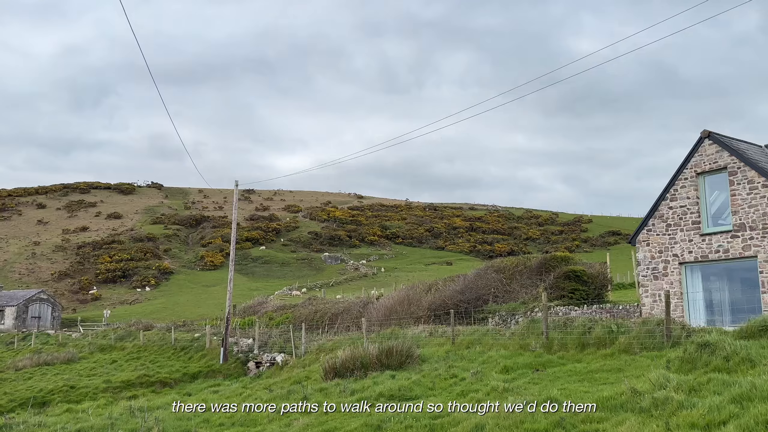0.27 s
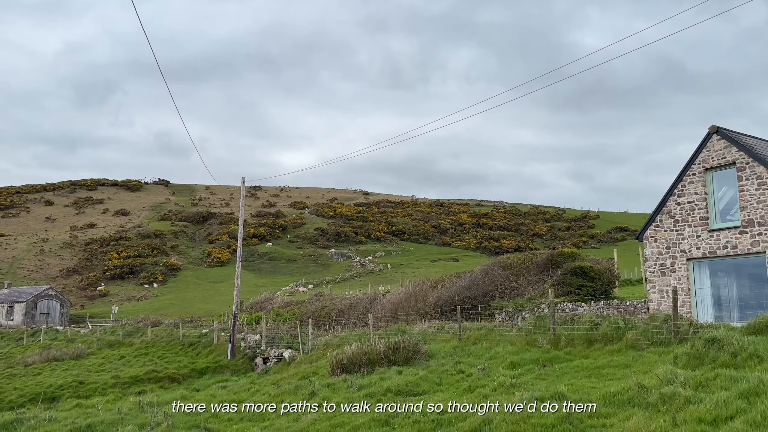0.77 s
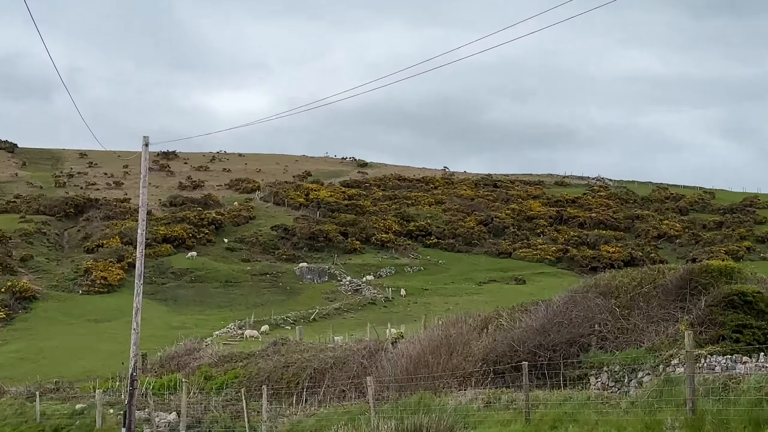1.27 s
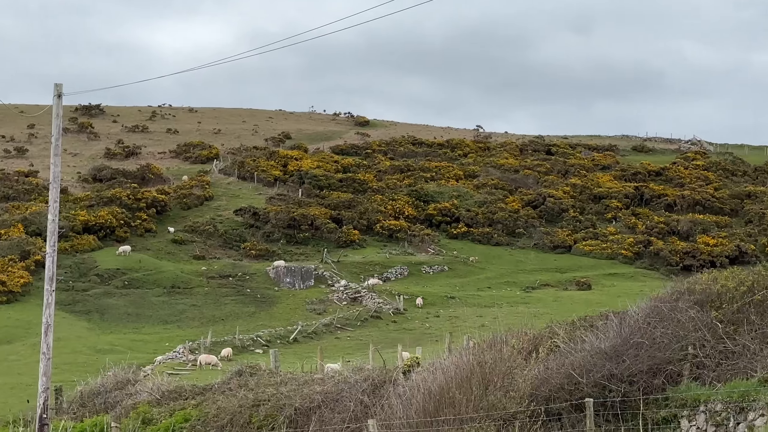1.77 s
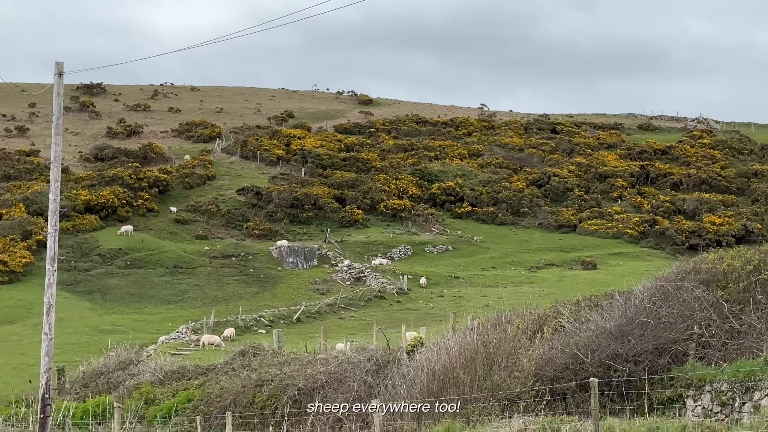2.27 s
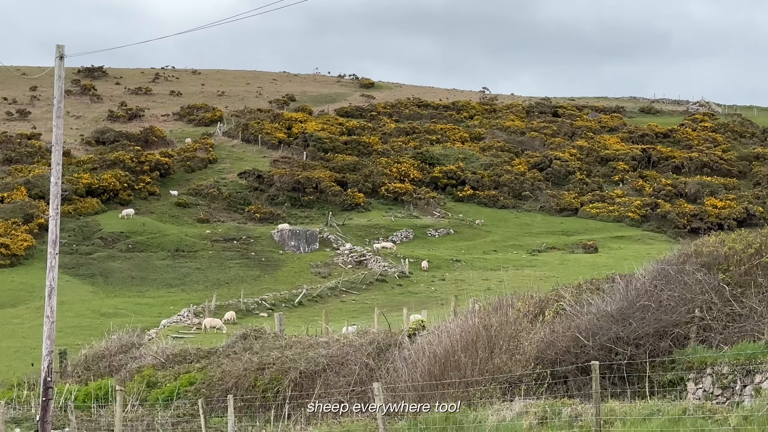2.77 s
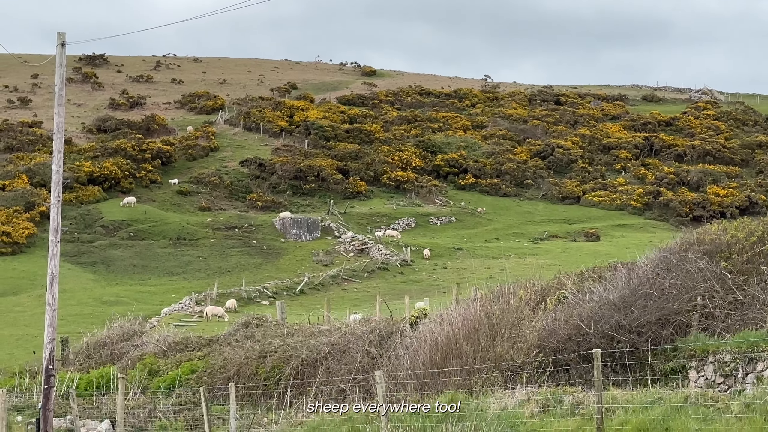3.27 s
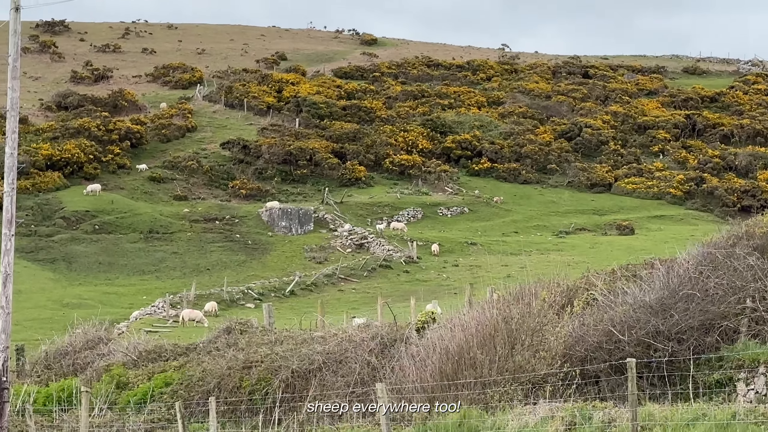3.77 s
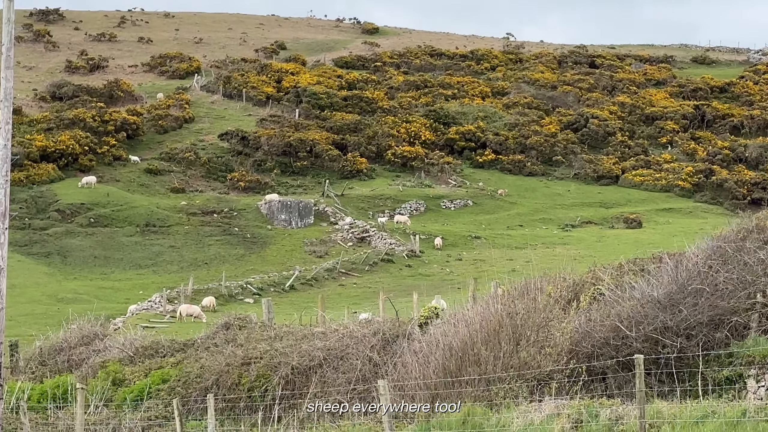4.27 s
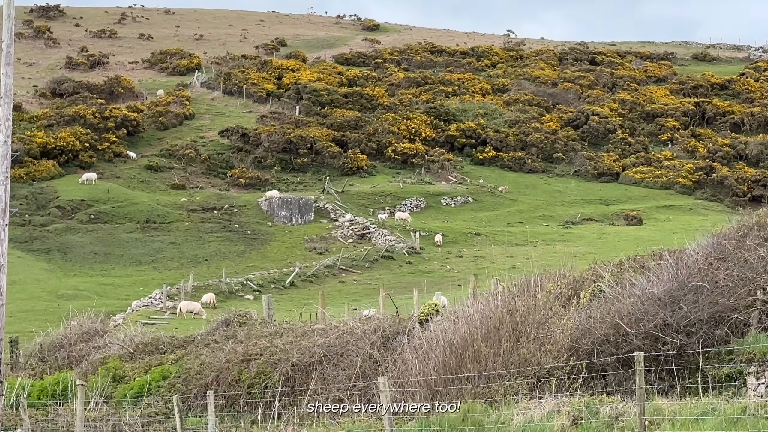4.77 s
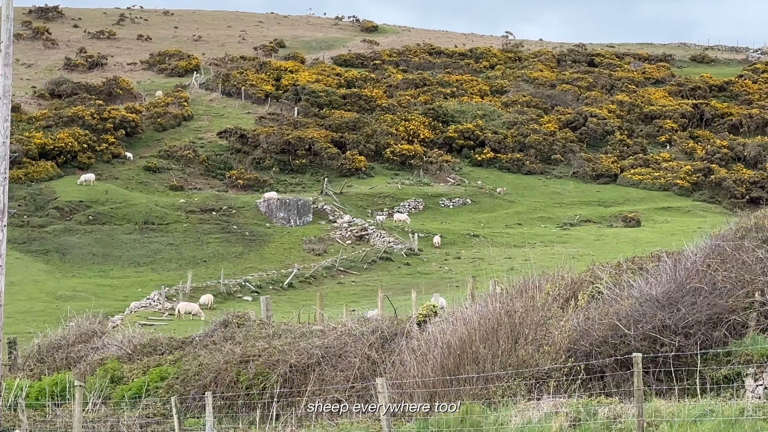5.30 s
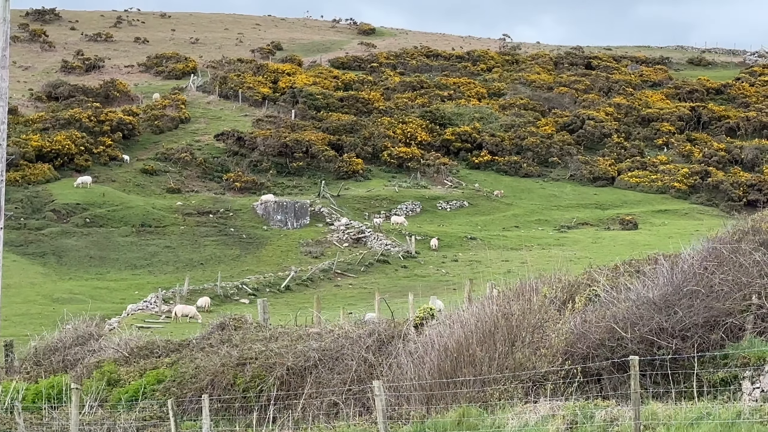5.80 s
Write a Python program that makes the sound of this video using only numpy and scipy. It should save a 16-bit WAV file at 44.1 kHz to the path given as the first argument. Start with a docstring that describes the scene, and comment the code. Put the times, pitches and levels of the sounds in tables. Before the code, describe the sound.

Low, uneven wind buffets the microphone outdoors, strongest in the first two seconds, after a quick rustle of cloth. Beneath the gusts a sheep bleats once with a rough, wavering voice. A small songbird then chirps thin, gliding notes and closes with a rapid trill, joined briefly by faint fluty piping from across the field. A faraway lamb stutters a bleat at the end as lighter puffs of wind continue.

```python
"""A breezy hill pasture. Cloth rustles briefly, then swirls of wind rumble and thump on the microphone.
A sheep gives one long, hoarse bleat: puffs of air from its throat make its mouth ring.
A wren sings gliding whistles and trills, and a lower-voiced bird pipes far off.
At the end a distant lamb bleats in short, shaky bursts. A soft hush lies under it all."""
import sys
import numpy as np
from scipy import signal
from scipy.fft import rfft, irfft
from scipy.io import wavfile
from scipy.ndimage import uniform_filter1d

SR = 44100
rng = np.random.default_rng(int(sys.argv[2]) if len(sys.argv) > 2 else 0)


def wav_out(sig):
    """Save sig, one row per channel (or a flat mono array), as 16-bit PCM at SR to the path in sys.argv[1]."""
    wavfile.write(sys.argv[1], SR, np.round(np.clip(np.atleast_2d(sig).T, -1, 1) * 32767).astype(np.int16))


N = 266319
T = np.arange(N) / SR


def wind(hit_s=0.0036, cutoff_hz=455, db_per_octave=29, hiss_hz=(9400, 11200)):
    """Faster air sheds smaller swirls, so the wind grows louder and brighter together."""
    # sharp swirls hitting the microphone: t/s, relative level/dB
    buffets = [(0.342, -37.5), (0.409, -38.5), (0.491, -35), (0.536, -29.5), (0.547, -32.5), (0.617, -30.5),
               (0.673, -37), (0.964, -34), (0.999, -28.5), (1.01, -29), (1.04, -26.5), (1.07, -32),
               (1.097, -28.5), (1.117, -26.5), (1.138, -29), (1.199, -28.5), (1.266, -29.5), (1.3, -36.5),
               (1.783, -22.5), (1.816, -17.5), (1.841, -17.5), (1.858, -35), (2.184, -43.5), (2.318, -42),
               (2.422, -43), (2.452, -45.5), (2.512, -48.5), (2.564, -42.5), (2.633, -40), (2.669, -41.5),
               (2.766, -40.5), (3.389, -42), (3.639, -48), (5.417, -40.5), (5.908, -39.5)]
    # tone of the rumble: f/Hz, relative level/dB
    rumble_tone = [(25, -36), (42, -3), (65, 6.5), (120, -0.5), (190, -6.5), (270, -27), (600, -62)]
    large, small = gusts()
    lumps = np.minimum(drift(45), 1)  # lulls are deep, surges limited
    hits = 1e-6
    for s, db in buffets:
        age = np.clip((T - s) / hit_s, 0, 40)
        hits = hits + from_db(db) * age * np.exp(1 - age)
    # small swirls flutter, up to a cutoff that rises with their force
    force = np.hypot(small * from_db(-2 + 7.5 * lumps), from_db(-8) * hits)
    left_brighter = np.array([[0.04], [-0.04]])
    cutoff = cutoff_hz * 2 ** ((20 * np.log10(force) + 50) / db_per_octave + left_brighter)
    flutter = sum(x * hz ** -1.054 / np.sqrt(1 + (hz / cutoff) ** 14)
                  for hz, x in noise_bands(230, count=7))
    # large swirls rumble; in the lulls only the deepest are left
    push = np.hypot(large * from_db(3 * lumps), from_db(-12) * hits)
    tilt = 0.52 * (20 * np.log10(push) + 45)  # dB per octave
    rumble = sum(x * from_db(at_hz(rumble_tone, hz) + tilt * np.log2(hz / 65))
                 for hz, x in noise_bands(28, count=9))
    # a thin hiss at the microphone's openings follows the flow
    hiss = unit_power(band(rng.standard_normal((2, N)), *hiss_hz))
    hiss_gain = from_db(-57) * np.sqrt(push * push.mean())
    pressure = force * evened(flutter, 0.017) + push * evened(rumble, 0.025) + thumps()
    return microphone_openings(pressure) + hiss_gain * hiss


def gusts(rise_share=0.51, edge_drop_db=4.5, roundness=1.41):
    """Gusts swell and ebb over the breeze. Gives the strength of the large swirls and the small ones."""
    # the light breeze between gusts: t/s, level/dB
    breeze = [(0, -51.5), (0.3, -52), (0.75, -43.5), (1.3, -49.5), (1.6, -64), (2.05, -52), (2.25, -61),
              (2.5, -51.5), (3.2, -62.5), (3.7, -55), (4.2, -61.5), (4.55, -65), (4.8, -68.5), (5.05, -68),
              (5.25, -54.5), (5.7, -69), (6.03, -56)]
    # gusts: peak t/s, length/s, level/dB, flutter compared with the gust/dB
    gust_peaks = [(0.399, 0.079, -42.5, -5), (0.552, 0.072, -37, -9), (0.993, 0.062, -36.5, -7.5),
                  (1.076, 0.053, -35.5, -7.5), (1.137, 0.13, -33, -10), (1.283, 0.054, -41, -2),
                  (1.443, 0.16, -47.5, -29), (1.68, 0.051, -43, -5.5), (1.823, 0.1, -35, -4.5),
                  (1.979, 0.044, -42.5, -22.5), (2.441, 0.017, -48, -9), (2.665, 0.046, -41.5, -3.5),
                  (2.757, 0.054, -41, -24), (2.857, 0.14, -51.5, -5), (3.343, 0.042, -42.5, -12.5),
                  (3.448, 0.046, -48.5, -7.5), (4.313, 0.039, -46, -14), (4.345, 0.2, -52, -8.5),
                  (5.146, 0.051, -54, -30), (5.353, 0.036, -40.5, -13), (5.422, 0.052, -42.5, -24),
                  (5.8, 0.029, -48, -12.5), (5.937, 0.061, -46, -10.5), (6.052, 0.041, -36.5, -5)]
    large = envelope(breeze) ** 2
    small = large * from_db(-17) ** 2
    for s, length, db, flutter_db in gust_peaks:
        near = slice(max(int((s - 3 * length) * SR), 0), int((s + 4 * length) * SR))
        from_peak = np.maximum((s - T[near]) / rise_share, (T[near] - s) / (1 - rise_share)) / length
        power = from_db(db - edge_drop_db * from_peak ** roundness) ** 2
        large[near] += power
        small[near] += power * from_db(flutter_db) ** 2
    return np.sqrt(large), np.sqrt(small)


def thumps(swell_s=0.0074):
    """A big swirl shoves the microphone and leaves a round, low swing of pressure."""
    # shoves: t/s, level/dB, f/Hz
    shoves = [(0.105, -37.5, 76), (0.679, -30.5, 84), (1.008, -30.5, 102.7), (1.087, -26, 75),
              (1.793, -30.5, 65), (2.771, -34.5, 90.4), (4.311, -35.5, 58.5), (4.624, -48, 93)]
    out, age = np.zeros(N), T[:SR // 10]
    swell = age / swell_s * np.exp(1 - age / swell_s)
    for s, db, hz in shoves:
        add(out, s - swell_s, from_db(db) * swell * np.sin(2 * np.pi * hz * age))
    return out


def microphone_openings(pressure, overload=0.081, top_hz=1400):
    """The openings smooth away tiny swirls and round off hard ones; air reaches the left one later."""
    left, right = overload * np.tanh(pressure / overload)
    hz = np.arange(N // 2 + 1) * SR / N
    lag_rad = 1.3 * hz / (hz + 330)
    left = irfft(rfft(left) * np.exp(-1j * lag_rad), N)
    return signal.sosfilt(signal.butter(10, top_hz, fs=SR, output="sos"), [left, right])


def sheep(pitch_shake=.05, jitter=.03, hoarseness=.33, shake_db=2, tongue_width_hz=220):
    """Shaky throat puffs make the mouth ring; the rings set by the tongue climb and grow stronger."""
    # rise and fall of the bleat: t/s, relative level/dB
    loudness = [(0.93, -100), (0.98, -77.5), (1.18, -74.5), (1.4, -75), (1.52, -75), (1.62, -75),
                (1.66, -79.5), (1.76, -79.5), (1.88, -85.5), (1.93, -92.5)]
    # throat and tongue: t/s, pitch/Hz, tongue ring/Hz
    throat = [(0.93, 142.7, 2140), (1.17, 155, 2150), (1.42, 155.8, 2230), (1.52, 156.2, 2320),
              (1.65, 151.9, 2364), (1.93, 146.3, 2446)]
    # moments when the shaking voice dips: t/s
    dips = [1.02, 1.101, 1.192, 1.273, 1.345, 1.414, 1.477, 1.557, 1.647, 1.746, 1.831, 1.9]
    # steady rings of the mouth: f/Hz, width/Hz, relative level/dB
    mouth = [(657, 59, 29.5), (800, 115, 20.5), (1410, 200, 7), (1587, 190, 6), (3160, 230, -12)]
    pitch, tongue = in_time(throat)
    shake = -np.cos(2 * np.pi * np.interp(T, dips, np.arange(len(dips))))
    cycles = np.cumsum(pitch * (1 + pitch_shake * shake + jitter * drift(98))) / SR
    puffs = np.diff(np.floor(cycles), prepend=0) * from_db(2 * drift(60))
    breath = rng.standard_normal(N) * np.exp(-4 * (cycles % 1))  # a hiss after each puff
    source = (unit_power(puffs) + hoarseness * unit_power(breath)) * from_db(shake_db * shake)
    voice = sum((-1) ** k * from_db(db) * resonate(source, hz, width)
                for k, (hz, width, db) in enumerate(mouth))
    opening_db = 4 * np.minimum(T - loudness[-1][0], 0)  # climbs to 0 as the bleat ends
    for centre, db in (tongue, 7), (tongue + 290, 3.5):
        voice = -voice + from_db(db + opening_db) * moving_ring(source, centre, tongue_width_hz)
    voice = band(band(voice, 853, 3300), 400, 3200)
    return from_db(-shake_db) * envelope(loudness) * voice / np.std(band(voice, 1950, 3000))


def wren(bounce_s=0.0035, bounce_db=-12, echo_s=0.09, echo_db=-24):
    """A song in four parts; a bounce off the ground breaks up the glides and a faint echo follows."""
    song = wren_pips() + wren_whistles() + wren_seesaw() + wren_trill()
    out = song.copy()
    for s, db in (bounce_s, bounce_db), (echo_s, echo_db):
        add(out, s, from_db(db) * song)
    return out


def wren_pips(first_db=-99, step_db=3):
    """The song opens with evenly spaced pips, each louder than the last."""
    # pitch path of one pip: f/Hz
    pip_hz = [4250, 3906, 3940]
    out = np.zeros(N)
    for k, s in enumerate(np.arange(1.917, 2.4, .057)):
        db = first_db + step_db * k
        add(out, s - .016, note(0.0093, [4500, 5100, 4700], [db - 4]))  # tiny lead-in
        add(out, s, note(0.025, pip_hz, [db]))
    return out


def wren_whistles(flick_s=.027, slide_end_hz=3754):
    """The free part of the song: plain whistles, warbles, high arcs and downward slides."""
    # plain whistles: t/s, length/s, start f/Hz, end f/Hz, level/dB
    whistles = [(2.43, 0.098, 5165, 4990, -70), (2.665, 0.058, 3610, 3890, -81.5),
                (2.751, 0.099, 3620, 3940, -88), (3.011, 0.039, 3530, 4050, -75),
                (3.949, 0.17, 4024, 3840, -79), (4.119, 0.027, 7500, 6500, -78),
                (4.141, 0.15, 6840, 6630, -75), (5.295, 0.038, 5100, 6290, -65.5),
                (5.325, 0.097, 6660, 5840, -77), (5.949, 0.075, 7100, 6400, -86)]
    # warbles: t/s, length/s, centre f/Hz, swing/Hz, swing rate/Hz, final level/dB, swell/dB
    warbles = [(2.448, 0.19, 6780, 200, 19, -87, 2), (2.845, 0.12, 6310, 300, 21, -79.5, 0),
               (3.141, 0.064, 6070, 544, 16, -63.5, 14.5)]
    # high arcs that flick up and sink slowly: t/s, length/s, level/dB
    arcs = [(3.364, .136, -83.5), (3.648, .124, -83)]
    # slides that linger halfway: t/s, length/s, start f/Hz, bend/Hz, level/dB
    slides = [(3.242, 0.067, 5910, 297, -62), (3.527, 0.086, 6060, 364, -67.5),
              (3.802, 0.08, 6200, 376, -66.5)]
    out, progress = np.zeros(N), np.linspace(0, 1, 40)
    for s, length, start_hz, end_hz, db in whistles:
        arch = .016 * np.sin(np.pi * progress)
        scoop = 0.061 * np.exp(-progress * length / 0.0051)  # slides up into the pitch
        glide = (start_hz + (end_hz - start_hz) * progress) * (1 + arch - scoop)
        add(out, s, note(length, glide, [db - 2.5, db, db - 2.5]))
    for s, length, hz, swing_hz, rate, db, swell_db in warbles:
        age = progress * length
        glide = hz + swing_hz * np.sin(2 * np.pi * rate * age) - 1500 * np.exp(-age / 0.0035)
        add(out, s, note(length, glide, [db - swell_db, db - swell_db, db]))
    for s, length, db in arcs:
        add(out, s, note(flick_s, [4500, 6600, 7500, 7900], [db - 1, db - 10]))
        sink = note(length - flick_s, [7800, 7650, 7540, 7330, 6880], [db - 10, db - 7, db + 1])
        add(out, s + flick_s, sink)
    for s, length, start_hz, bend_hz, db in slides:
        glide = start_hz + (slide_end_hz - start_hz) * progress - bend_hz * np.sin(2 * np.pi * progress)
        add(out, s, note(length, glide, [db - 7, db - 1.5, db - 5.5]))
    return out


def wren_seesaw(start_s=4.35, period_s=.1695, count=6):
    """Falling and rising notes take turns, softer each time, ending on a fall."""
    fall_hz, rise_hz = [6080, 5340, 4780, 4250, 4060, 3690], [4430, 4850, 4980, 5360, 5750]
    out = np.zeros(N)
    for k in range(count):
        s, db = start_s + k * period_s, -67.5 - 1.5 * k
        add(out, s, note(0.051, fall_hz, [db - 1, db, db - 4]))
        if k < count - 1:
            add(out, s + .087, note(0.062, rise_hz, [db - 4.5, db + 1.5, db + 1.5]))
    return out


def wren_trill():
    """A fast run of tiny, blurred downward flicks closes the song."""
    out = np.zeros(N)
    for k, s in enumerate(np.arange(5.425, 5.93, .0328)):
        levels_db = -86 - 0.04 * k + rng.normal(0, 2, size=4)
        add(out, s, note(0.014, [6400, 5100, 4000], levels_db, edge_s=.005, tremble=.06))
    return out


def far_bird():
    """Slow, fluty notes from across the field, wavering in the moving air."""
    # notes: t/s, length/s, start f/Hz, middle f/Hz, end f/Hz, relative level/dB
    piping = [(2.03, 0.052, 2375, 2330, 2190, -89), (2.235, 0.065, 2500, 2350, 2060, -83),
              (2.33, 0.1, 2450, 2230, 1920, -89), (2.45, 0.21, 2120, 2075, 1925, -89),
              (2.635, 0.283, 2265, 2227, 2250, -83), (2.879, 0.145, 2880, 2440, 2280, -81),
              (3.021, 0.085, 2370, 2530, 2600, -89.5), (4.11, 0.14, 2710, 2580, 2350, -97)]
    out = np.zeros(N)
    for s, length, *pitches, db in piping:
        add(out, s, note(length, pitches, [db - 1], edge_s=0.0052, tremble=.003))
    return out * from_db(-drift(25))


def lamb(start_s=5.245, end_s=5.995, burst_s=.068, breath=0.61, ring_hz=2815, bright_hz=3800):
    """A high, breathy buzz rings the mouth in short, rounded bursts, some longer than others."""
    # strength of the mouth's rings: t/s, main ring level/dB, brighter ring level/dB
    ring_levels = [(5.27, -79, -84.5), (5.34, -85, -79.5), (5.42, -82, -80), (5.48, -73.5, -83.5),
                   (5.62, -73, -85), (5.68, -78.5, -99), (5.98, -89, -85)]
    # pitch of the voice: t/s, f/Hz
    pitch_path = [(5.28, 292.7), (5.35, 308), (5.42, 306), (5.48, 314), (5.62, 313), (5.97, 293)]
    arch = np.abs(np.sin(np.pi * (T - start_s) / burst_s)) * (T > start_s) * (T < end_s)
    gap = np.clip(.4 + .1 * drift(10), .1, .8)  # the voice breaks off below this
    bursts = np.sin(np.pi / 2 * np.clip((arch - gap) / (1 - gap), 0, 1))
    ring_db, bright_db = in_time(ring_levels)
    pitch, = in_time(pitch_path)
    cycles = np.cumsum(pitch * (1 + 0.04 * (arch - .9) + 0.0049 * drift(60))) / SR
    buzz = unit_power(sum(np.cos(2 * np.pi * k * cycles) for k in range(1, 20)))
    source = buzz + breath * rng.standard_normal(N)
    ring = evened(resonate(resonate(source, ring_hz, 150), ring_hz, 600)[None], burst_s)[0]
    low = unit_power(resonate(resonate(source, 770, 190), 960, 600))
    bright = unit_power(resonate(resonate(source, bright_hz, 450), bright_hz, 1100))
    return bursts * (from_db(ring_db) * ring + from_db(bright_db) * bright + from_db(-78) * low)


def rustle(grit_db=2):
    """Cloth brushes past the microphone: a gritty hiss with one short double scuff in it."""
    # loudness of the cloth's hiss and of its scuff: t/s, level/dB
    hiss_levels = [(0, -73.5), (0.18, -72), (0.3, -67), (0.37, -74.5), (0.9, -81), (1.3, -104)]
    scuff_levels = [(0.148, -83), (0.161, -54.5), (0.169, -58), (0.179, -52), (0.186, -45.5),
                    (0.195, -64.5), (0.28, -77), (0.32, -71)]
    # tone of each: f/Hz, relative level/dB
    hiss_tone = [(200, -4.5), (1000, 11), (4000, -1), (7000, -1.5), (9000, -8.5), (15000, -12.5)]
    scuff_tone = [(400, -4), (1200, 20), (2000, 16.5), (3000, 2), (5000, -0.5), (15000, -19)]
    scuff = envelope(scuff_levels) * coloured(scuff_tone) * from_db([[0.5], [-0.5]])  # a little left
    hiss = envelope(hiss_levels) * coloured(hiss_tone)
    grit = unit_power(from_db(grit_db * drift(350)))
    return (hiss + scuff) * grit


def ticks(decay_s=0.0003):
    """Small dry snaps that die within a few milliseconds."""
    # snaps: t/s, peak level/dB, lowest f/Hz, highest f/Hz
    snaps = [(0.189, -52, 1100, 4720), (0.336, -46.5, 1490, 10500), (2.825, -52.5, 980, 3400),
             (4.572, -44.5, 1110, 4000)]
    out, age = np.zeros(N), T[:SR // 20]
    for s, db, low_hz, high_hz in snaps:
        snap = band(rng.standard_normal(len(age)) * np.exp(-age / decay_s), low_hz, high_hz)
        add(out, s, from_db(db) * snap / np.abs(snap).max())
    return out


def open_air():
    """The soft, steady hush of the outdoors."""
    # tone of the hush: f/Hz, relative level/dB
    hush_tone = [(30, 0), (100, -6), (250, -1.5), (850, -8), (1300, -16), (2300, -17.5), (3300, -54),
                 (6600, -12.5), (8000, -79.5), (10000, -42), (14000, -47)]
    return from_db(-74.5) * coloured(hush_tone)


def outdoors(x, echo_db, fade_s, width, pan_db=0):
    """The direct sound plus thin echoes scattered by bushes and hillside."""
    mid, side = rng.standard_normal((2, SR)) * from_db(-60 * T[:SR] / fade_s)
    response = mid + width * np.array([side, -side])
    response *= from_db(echo_db) / np.sqrt(np.sum(response[0] ** 2))
    response[:, 0] += 1  # the direct sound
    return signal.fftconvolve(x[None], response, axes=1)[:, :N] * from_db([[pan_db / 2], [-pan_db / 2]])


def note(length, pitches, levels, edge_s=0.0088, tremble=.008):
    """A bird's near-pure whistle glides through its pitches, trembling in pitch and level."""
    progress = np.linspace(0, 1, int(length * SR))
    waver, flutter = (np.interp(progress * length, np.arange(100) / 300, row)
                      for row in rng.standard_normal((2, 100)))
    glide = np.interp(progress, np.linspace(0, 1, len(pitches)), pitches)
    hz = uniform_filter1d(glide, len(progress) // 8, mode="nearest") * (1 + tremble * waver)
    db = np.interp(progress, (np.arange(len(levels)) + .5) / len(levels), levels) + 4 * flutter
    from_edge_s = np.minimum(progress, 1 - progress) * length
    fade = np.sin(np.pi / 2 * np.clip(from_edge_s / edge_s, 0, 1)) ** 2
    return np.sqrt(2) * from_db(db) * fade * np.sin(2 * np.pi * np.cumsum(hz) / SR)


def noise_bands(low, count):
    """Stereo noise in half-octave slices, each given as (centre frequency, sound)."""
    # how alike left and right are: f/Hz, likeness from 0 to 1
    likeness = [(30, 0.97), (600, 0.65), (1800, 0.56), (12000, 0.12)]
    white = rng.standard_normal((2, 2, N))
    for k in range(count):
        hz = low * 2 ** (k / 2)
        alike = at_hz(likeness, hz)
        mid, side = white[k % 2]
        pair = np.sqrt(1 + alike) * mid + np.sqrt(1 - alike) * np.array([side, -side])
        yield hz, band(pair, hz / 2 ** .25, hz * 2 ** .25)


def coloured(tone):
    """Stereo noise with the given tone and a power of 1."""
    return unit_power(sum(from_db(at_hz(tone, hz)) * x for hz, x in noise_bands(28, count=19)))


def evened(x, seconds):
    """Take the slow swells out of a sound."""
    return x / np.sqrt(uniform_filter1d(np.mean(x ** 2, axis=0), int(seconds * SR)) + 1e-9)


def drift(rate):
    """A smooth random wobble of about 1 either way; a higher rate wobbles faster."""
    r = np.exp(-40 * np.pi * rate / SR)
    slow = signal.lfilter([1], [1, -2 * r, r * r], rng.standard_normal(N // 20 + 2002))[2000:]
    return np.interp(np.arange(N) / 20, np.arange(len(slow)), unit_power(slow))


def band(x, low, high):
    """Keep what lies between two frequencies."""
    sections = signal.butter(2, [low, min(high, SR / 2 - 500)], "band", fs=SR, output="sos")
    return signal.sosfilt(sections, x + 1e-18)


def resonate(x, hz, width):
    """Make a sound ring at one frequency; a narrower width rings longer."""
    r = np.exp(-np.pi * width / SR)
    feedback = [1, -2 * r * np.cos(2 * np.pi * hz / SR), r * r]
    return signal.lfilter(np.array([1, 0, -1]) * (1 - r * r) / 2, feedback, x + 1e-18)


def moving_ring(x, hz, width):
    """Make a sound ring at a frequency that moves over time."""
    r = np.exp(-np.pi * width / SR)
    turn = np.exp(2j * np.pi * np.cumsum(hz) / SR)
    return 2 * (1 - r) ** 2 * np.real(turn * signal.lfilter([1], [1, -2 * r, r * r], x / turn))


def from_db(db):
    """Turn decibels into a multiplier."""
    return 10 ** (np.asarray(db) / 20)


def unit_power(x):
    """Scale to an average power of 1."""
    return x / np.sqrt(np.mean(x ** 2) + 1e-20)


def in_time(rows):
    """Join a table's timed points into one curve per column."""
    s, *columns = np.transpose(rows)
    return [np.interp(T, s, c) for c in columns]


def envelope(rows):
    """A loudness curve through timed levels, silent before and after."""
    s, db = np.transpose(rows)
    return np.interp(T, s, from_db(db), left=0, right=0)


def at_hz(points, hz):
    """Read a table at a frequency, with octaves evenly spaced."""
    f, value = np.transpose(points)
    return np.interp(np.log(hz), np.log(f), value)


def add(out, start, sound):
    """Mix a sound in at a start time in seconds."""
    i = int(start * SR)
    out[i:i + len(sound)] += sound[:N - i]


def scene():
    """Animals in the open, wind and small noises at the microphone."""
    flock = outdoors(sheep(), echo_db=-9.5, fade_s=0.14, width=0.3, pan_db=2.2)
    flock += outdoors(lamb(), echo_db=-9, fade_s=.6, width=0.43)
    birds = outdoors(wren(), echo_db=-9, fade_s=0.22, width=0.59)
    birds += outdoors(far_bird(), echo_db=-12.5, fade_s=1.0, width=0.63)
    hush = open_air()
    return wind() + flock + birds + rustle() + ticks() + hush


def record(dry):
    """The highest treble is cut off steeply."""
    return signal.sosfilt(signal.ellip(10, .1, 70, 15000, fs=SR, output="sos"), dry)


dry = scene()
out = record(dry)
wav_out(out)
```